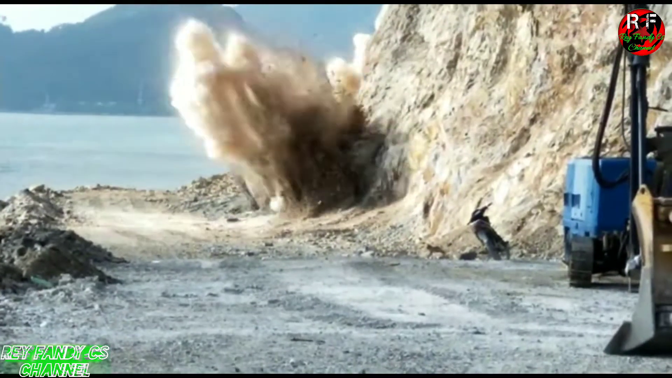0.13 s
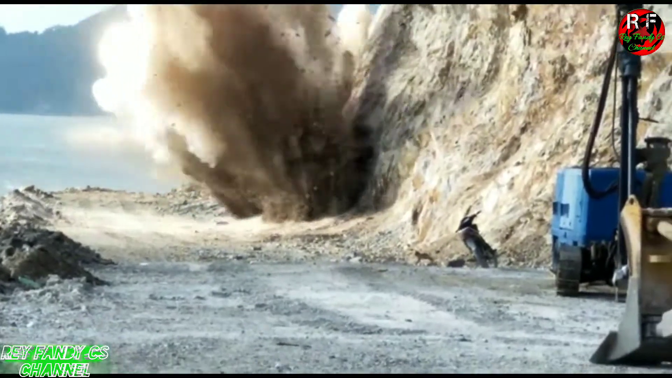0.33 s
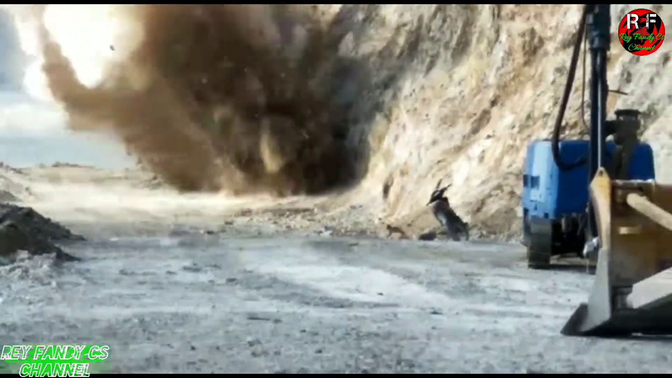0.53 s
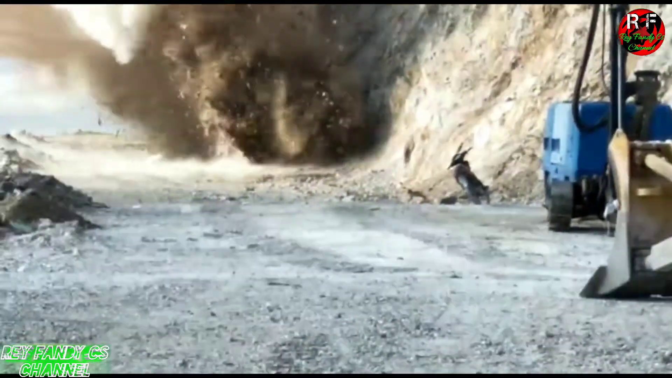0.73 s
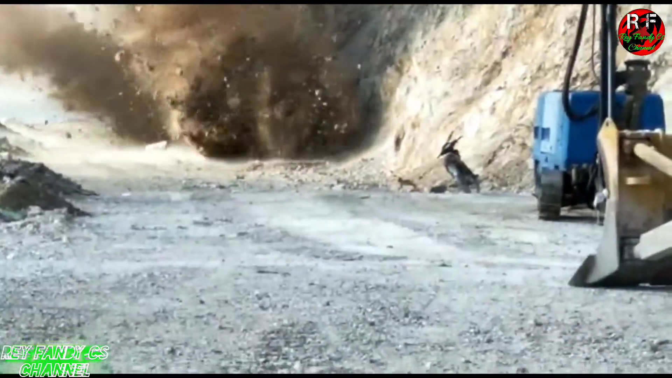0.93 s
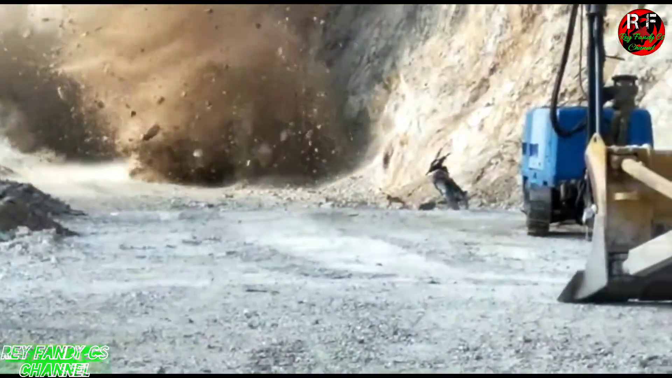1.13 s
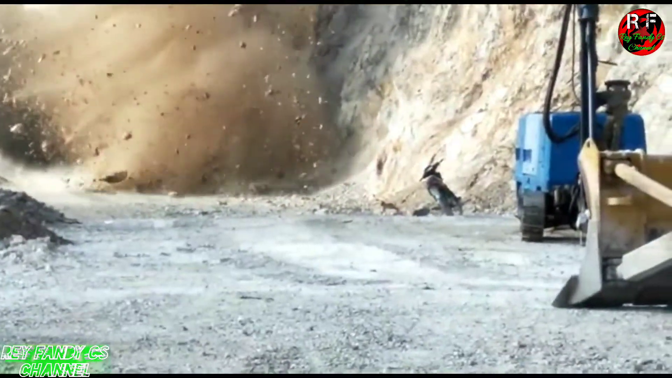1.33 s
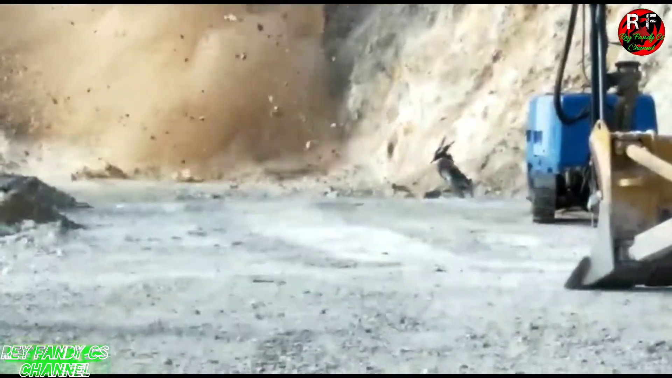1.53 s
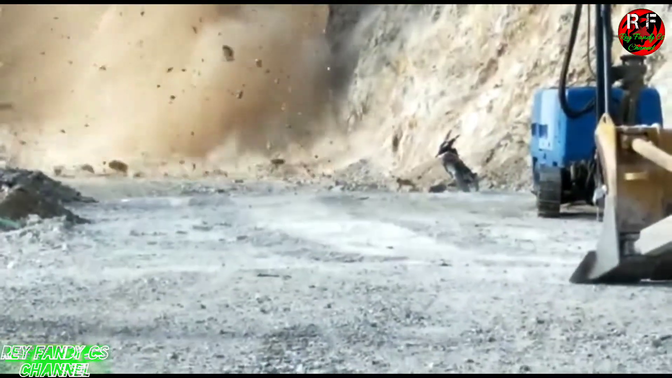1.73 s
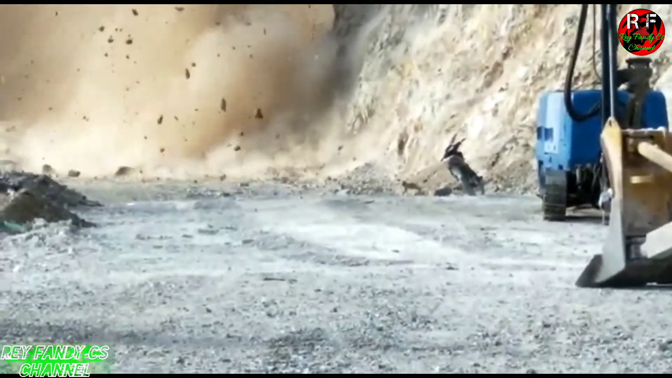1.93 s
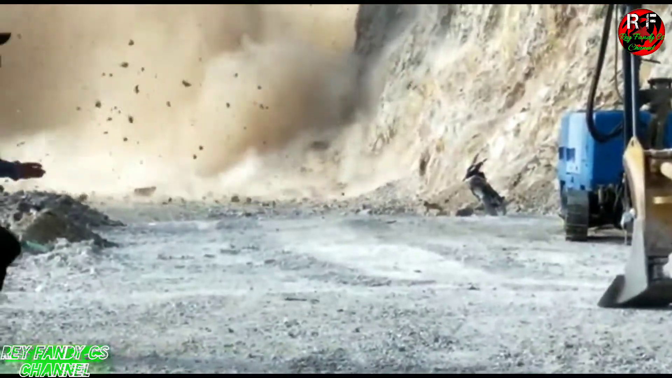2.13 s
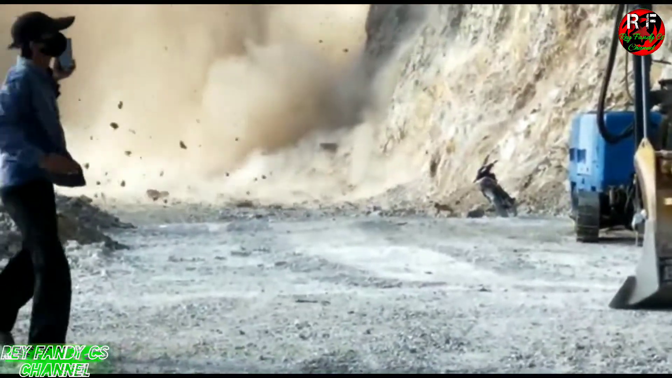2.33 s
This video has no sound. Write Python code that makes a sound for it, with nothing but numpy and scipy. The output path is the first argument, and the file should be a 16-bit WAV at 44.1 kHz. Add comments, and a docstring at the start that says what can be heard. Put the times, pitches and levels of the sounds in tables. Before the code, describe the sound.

Rock blasting heard across an open yard: rapid low thuds, a sharp crack and choked boom, bursts of grit, tumbling blocks dying away under pattering gravel and single stone clicks, with faint hiss and light breeze.

```python
"""A run of ground thumps is heard first: charges fire one after another in a quarry face across the yard.
The rock tears as crowded random fractures; a ringing crack and decaying swings of pressure form the air blast,
which briefly chokes the microphone by saturation. Gas and grit burst out as surges of dense impacts, heavy rock
rumbles down, and a shower of small stones, made of random impacts over noise, swells as the rumble dies.
Single nearer stones click as short bands of noise, over a steady yard hiss and a light breeze."""
import sys
import numpy as np
from scipy.fft import rfft, irfft, next_fast_len
from scipy.io import wavfile
from scipy.ndimage import map_coordinates

SR = 44100
rng = np.random.default_rng(int(sys.argv[2]) if len(sys.argv) > 2 else 0)


def bounce(signal):
    """Save signal as a 16-bit WAV file at the path given by the first command-line argument."""
    frames = np.transpose(np.atleast_2d(signal))
    limited = np.clip(frames, -1, 1)
    pcm = np.round(limited * 32767).astype(np.int16)
    wavfile.write(sys.argv[1], SR, pcm)


N = 108045
FFT_LENGTH = 2 * next_fast_len(N // 2 + 8192, real=True)  # padded so that filter tails do not wrap round


# Pressure waves in the air: (start [s], level before attack and decay [dB], pitch [Hz], T60 [s])
PRESSURE_WAVES = [(0.4024, -3.5, 38.7, 0.11), (0.521, -4.5, 38, 0.049), (0.663, -17.5, 49, .13),
                  (0.739, -23, 28.2, 0.29), (0.954, -18, 55, 0.11), (1.07, -24, 36, 0.12),
                  (1.14, -30, 52, .1)]
WAVE_ATTACK_S = 0.021  # time constant
CRACK_S, CRACK_LENGTH_S, CRACK_HZ, CRACK_DB = 0.413, 0.00202, 2514, -18.5
CRACK_SAG = 0.14  # share by which the crack's pitch starts above its mean and ends below it
CRACK_NOISE = 0.46  # rms of the hiss beside a ring of amplitude 1


def air_blast():
    """Shock radiation: a sharp front of falling pitch, with slow damped oscillations of pressure around it."""
    t = clock()
    swings = np.zeros(N)
    for start, db, hz, t60 in PRESSURE_WAVES:
        age = np.maximum(t - start, 0)
        attack = 1 - np.exp(-age / WAVE_ATTACK_S)
        swings += amp(db) * np.sin(2 * np.pi * hz * age) * fade(age, t60) * attack

    age = t - CRACK_S
    progress = np.clip(age / CRACK_LENGTH_S, 0, 1)
    ring = np.sin(2 * np.pi * CRACK_HZ * age * (1 + CRACK_SAG * (1 - progress)))
    hiss = noise([(1000, -10), (2500, -6), (4000, 1.5), (5500, -7), (9000, -26), (15000, -26)])
    envelope = np.sqrt(np.abs(np.sin(np.pi * progress)))  # zero before and after the crack
    crack = amp(CRACK_DB) * envelope * (ring + CRACK_NOISE * hiss)
    return swings + crack


FIRST_CHARGE_S, CHARGE_DELAY_S, CHARGE_COUNT = 0.19, 0.019, 9  # the holes fire one after another
CHARGE_PEAK_S, CHARGE_SPREAD_S = 0.24, 0.047  # centre and width of the bell curve of charge sizes
CHARGE_DB, CHARGE_T60_S = -28.5, 0.12  # rms level referred to one spread; decay of the echoes
# Transmission of the thumps through the ground: (frequency [Hz], relative level [dB])
GROUND_COLOUR = [(20, -20.5), (55, 5), (120, 1), (190, -1), (290, -11), (420, -15), (580, -25.5),
                 (850, -37), (1100, -34), (1600, -50), (4000, -68)]


def charges():
    """Ground transmission: delayed impulses and their short scatter of echoes pass through a low-pitched path."""
    t = clock()
    pulses = np.zeros(N)
    scatter = np.zeros(N)
    for start in FIRST_CHARGE_S + CHARGE_DELAY_S * np.arange(CHARGE_COUNT):
        size = np.exp(-((start - CHARGE_PEAK_S) / CHARGE_SPREAD_S) ** 2)
        pulses[round(start * SR)] = size
        scatter += size * fade(t - start, CHARGE_T60_S)
    echoes = unit(scatter * rng.standard_normal(N))
    thumps = colour(unit(pulses) + 1.2 * echoes, GROUND_COLOUR)
    spread_share = CHARGE_SPREAD_S * SR / N  # share of the whole duration
    return amp(CHARGE_DB) * unit(thumps) * np.sqrt(spread_share)


# Course of the rock tearing: (time [s], level [dB])
TEAR_LEVEL = [(.17, -80), (.205, -48.5), (.27, -44), (.335, -37), (.36, -37), (.388, -26.5), (.41, -36),
              (.46, -33.5), (.51, -52), (.7, -62)]
# Spectrum of the rock tearing: (frequency [Hz], relative level [dB])
TEAR_COLOUR = [(20, -13.5), (140, -7.5), (200, 2), (250, 3), (350, -9.5), (450, -8.5), (600, -16.5),
               (760, -8.5), (950, -10), (1100, -19.5), (1300, -29.5), (1600, -22), (2000, -34.5),
               (2400, -26.5), (3200, -41.5), (4300, -40), (15000, -74)]


def tearing():
    """Brittle fracture: many small breaks crowd together as the face breaks open."""
    return level(TEAR_LEVEL) * impacts(TEAR_COLOUR, per_s=900, spread_db=2.5, blur=0.67)


# Surges of gas and grit: (peak time [s], level [dB], rise time constant [s], T60 [s])
BURSTS = [(.388, -51.5, 0.025, 0.084), (0.464, -40, 0.017, 0.1), (.508, -47.5, .012, 0.092),
          (.585, -38, 0.029, 0.32), (.755, -45.5, 0.026, 0.32), (1.06, -46.5, 0.029, 0.22)]
# Spectrum of the gas and grit: (frequency [Hz], relative level [dB])
BURST_COLOUR = [(150, -13), (400, 5.5), (900, -3), (1250, -2.5), (1700, -1.5), (2100, -1), (2550, 0.5),
                (3200, -7.5), (4500, -8), (5500, -15), (7500, -7.5), (10000, -19), (15000, -27)]


def bursts():
    """Incoherent addition: gas drives grit out of the face in surges whose powers sum."""
    t = clock()
    power = np.zeros(N)
    for peak, db, rise, t60 in BURSTS:
        swell = np.exp(-np.abs(t - peak) / rise)
        surge = np.where(t < peak, swell, fade(t - peak, t60))
        power += (amp(db) * surge) ** 2
    return np.sqrt(power) * impacts(BURST_COLOUR, per_s=2500, spread_db=4, blur=0.75)


# Courses of the rumbling mass, tumbling blocks, falling stones and gravel shower: (time [s], level [dB])
RUMBLE_LEVEL = [(.36, -81), (.41, -28), (.49, -33.5), (.59, -36), (.78, -36), (.88, -40.5), (1.16, -41.5),
                (1.3, -46.5), (1.6, -50.5), (2.1, -52), (2.45, -51)]
BLOCK_LEVEL = [(.38, -81), (.45, -45.5), (.6, -44.5), (.8, -45), (1.1, -46.5), (1.35, -49.5), (1.85, -51.5),
               (2.45, -58.5)]
STONE_LEVEL = [(.3, -78), (.5, -58.5), (.8, -50.5), (1.05, -49), (1.4, -49), (1.8, -48), (2.13, -47.5),
               (2.3, -50), (2.45, -50.5)]
GRAVEL_LEVEL = [(.3, -76.5), (.55, -55.5), (.75, -53.5), (1, -50), (1.4, -48), (1.8, -46), (2.1, -45),
                (2.45, -47)]
# Spectra of the same four, deeper for the heavier rock: (frequency [Hz], relative level [dB])
RUMBLE_COLOUR = [(12, -17.5), (22, 2), (32, 4), (45, -1), (62, 0.5), (80, -5), (105, -5), (150, -12.5),
                 (250, -18), (400, -29.5), (900, -61)]
BLOCK_COLOUR = [(40, -16), (100, 1), (200, 0.5), (310, -3.5), (400, -5.5), (560, -11), (850, -10),
                (1200, -13.5), (2000, -19.5), (5000, -46)]
STONE_COLOUR = [(300, -23), (600, -9), (900, -1.5), (1150, -10), (1550, 0.5), (1800, -4), (2100, -3.5),
                (2450, 3), (2800, -6.5), (3250, -8), (4300, -11), (6000, -20), (12000, -49)]
GRAVEL_COLOUR = [(1000, -37.5), (2050, -16), (2450, -8), (2900, -6), (3300, -15), (3700, -3), (4000, -6),
                 (4250, 1), (4650, -2), (5000, -7.5), (5900, -10.5), (7800, -8), (8800, -15), (10000, -16),
                 (12000, -17.5), (13500, -27.5), (15500, -33)]


def rockfall():
    """Superposed random impacts: the mass rumbles and blocks tumble first; stones and gravel keep raining down."""
    rumble = level(RUMBLE_LEVEL) * impacts(RUMBLE_COLOUR, per_s=300, spread_db=2, blur=0.89)
    blocks = level(BLOCK_LEVEL) * impacts(BLOCK_COLOUR, per_s=400, spread_db=0.5, blur=0.7)
    stones = level(STONE_LEVEL) * impacts(STONE_COLOUR, per_s=900, spread_db=3, blur=1.0)
    gravel = level(GRAVEL_LEVEL) * impacts(GRAVEL_COLOUR, per_s=2200, spread_db=2, blur=1.0)
    # the two showers waver slightly in level, by random curves in dB
    stones *= amp(0.59 * wobble(30.4))
    gravel *= amp(0.35 * wobble(45))
    return rumble + blocks + stones + gravel


# Single stones striking nearer by: (time [s], level at the strike [dB], pitch [Hz], T60 [s])
CLICKS = [(.8796, -45, 4400, .015), (.9739, -34.5, 4580, 0.021), (1.228, -41, 4430, 0.013),
          (1.328, -44, 4530, .015), (1.554, -42, 2480, 0.042), (1.7043, -37.5, 4200, .015),
          (1.819, -43, 8800, 0.036), (2.0542, -43, 4530, 0.017), (2.198, -51, 9100, .025)]
CLICK_WIDTH = 0.18  # share of the pitch; the band is 12 dB down two widths to either side


def clicks():
    """Heavy damping: each nearer stone strikes with a narrow band of noise that dies almost at once."""
    out = np.zeros(N)
    for start, db, hz, t60 in CLICKS:
        below, above = hz * (1 - 2 * CLICK_WIDTH), hz * (1 + 2 * CLICK_WIDTH)
        ring = noise([(hz / 4, -35), (below, -12), (hz, 0), (above, -12), (hz * 2, -35)])
        out += amp(db) * fade(clock() - start, t60) * ring
    return out


YARD_DB, BREEZE_DB = -64, -61.5  # rms levels
# Spectrum of the steady hiss of the yard: (frequency [Hz], relative level [dB])
YARD_COLOUR = [(100, -4), (300, -5), (500, -10.5), (750, -2.5), (1200, -6.5), (2000, -2), (2600, 0),
               (3400, -7.5), (4600, -15.5), (5500, -22), (8000, -12), (10000, -23.5), (15000, -28)]


def yard():
    """Stationary noise: the steady hiss of the yard and a light, low breeze on the microphone."""
    hiss = amp(YARD_DB) * noise(YARD_COLOUR)
    breeze = amp(BREEZE_DB) * noise([(20, 0), (90, -5.5), (190, -25.5), (600, -52)])
    return hiss + breeze


def scene():
    """Linear superposition: the sum of everything that reaches the microphone."""
    return (air_blast() + charges() + tearing() + bursts() + rockfall() + clicks() + yard())[None]


OVERLOAD_DB, OVERLOAD_HARDNESS = -27, 6.5  # ceiling ahead of the microphone's colour; sharpness of the knee
TOP_HZ = 15600  # upper band limit
# Response of the microphone: (frequency [Hz], gain [dB])
MICROPHONE = [(20, 1.5), (150, 1.5), (400, 1.5), (4800, 1), (7500, -7.5), (15000, -7.5)]


def record(dry):
    """Saturation: the blast overloads the microphone and blanks finer sounds; colour and band limit follow."""
    overload = np.abs(dry[0] / amp(OVERLOAD_DB))
    choked = dry[0] / (1 + overload ** OVERLOAD_HARDNESS) ** (1 / OVERLOAD_HARDNESS)
    spectrum = rfft(colour(choked, MICROPHONE), FFT_LENGTH)
    passband = np.fft.rfftfreq(FFT_LENGTH, 1 / SR) < TOP_HZ
    return irfft(spectrum * passband, FFT_LENGTH)[None, :N]


def impacts(points, per_s, spread_db, blur):
    """Shot noise: random impacts of uneven size over a wash of countless further ones, rms 1."""
    struck = rng.random(N) < per_s / SR
    sign = np.sign(rng.standard_normal(N))
    size = amp(spread_db * np.clip(rng.standard_normal(N), -2, 2))
    wash = blur * rng.standard_normal(N)
    return unit(colour(unit(struck * sign * size) + wash, points))


def noise(points):
    """Filtered Gaussian noise: a spectrum through (Hz, dB) points, rms 1."""
    return unit(colour(rng.standard_normal(N), points))


def colour(x, points):
    """Minimum-phase filtering: gain through (Hz, dB) points, made causal by folding the cepstrum."""
    hz, db = np.transpose(points)
    bins_hz = np.fft.rfftfreq(FFT_LENGTH, 1 / SR)
    gain_db = np.interp(np.log(bins_hz + 1), np.log(hz + 1), db)
    cepstrum = irfft(np.log(amp(gain_db)), FFT_LENGTH)
    cepstrum[1:FFT_LENGTH // 2] *= 2
    cepstrum[FFT_LENGTH // 2 + 1:] = 0
    response = np.exp(rfft(cepstrum))
    return irfft(rfft(x, FFT_LENGTH) * response, FFT_LENGTH)[:N]


def wobble(rate):
    """Band-limited fluctuation: a smooth random curve through rate knots a second."""
    return map_coordinates(rng.standard_normal(1024), [clock() * rate], mode="wrap")


def fade(age, t60):
    """Exponential decay: a fall of 60 dB in t60 seconds from age 0, silent before."""
    return (age >= 0) * np.exp(-np.log(1000) * np.maximum(age, 0) / t60)


def level(rows):
    """Logarithmic level: gain along a (s, dB) curve of straight lines."""
    return amp(np.interp(clock(), *np.transpose(rows)))


def amp(db):
    """Decibel law: level to amplitude gain."""
    return 10 ** (np.asarray(db) / 20)


def unit(x):
    """Root-mean-square normalisation: scale to rms 1."""
    return x / np.sqrt(np.mean(x ** 2) + 1e-20)


def clock():
    """Uniform sampling: the time of each sample in seconds."""
    return np.arange(N) / SR


dry = scene()
out = record(dry)
bounce(out)
```